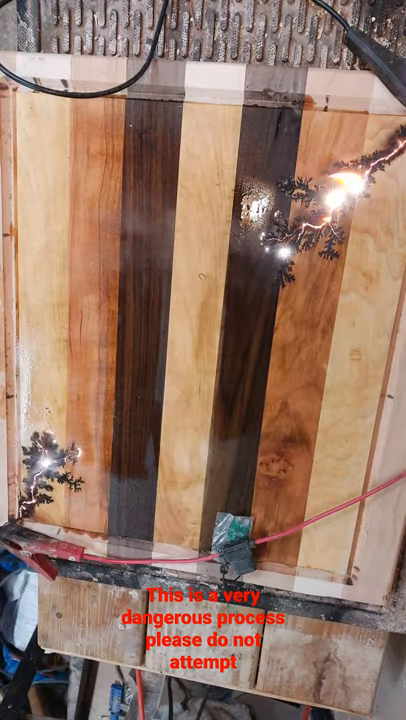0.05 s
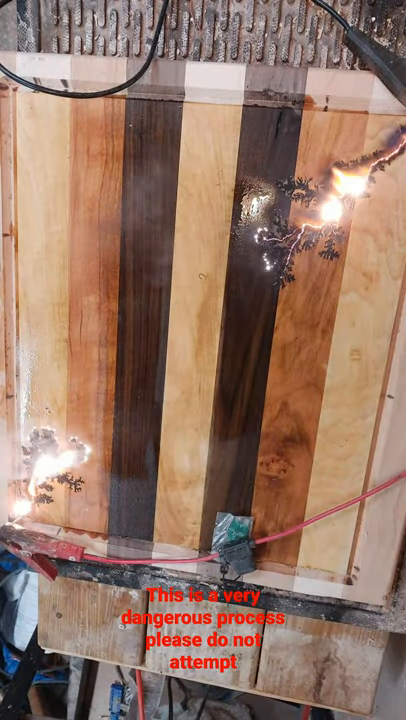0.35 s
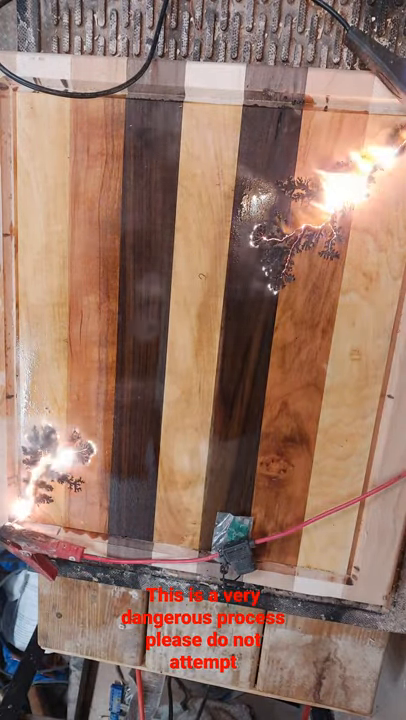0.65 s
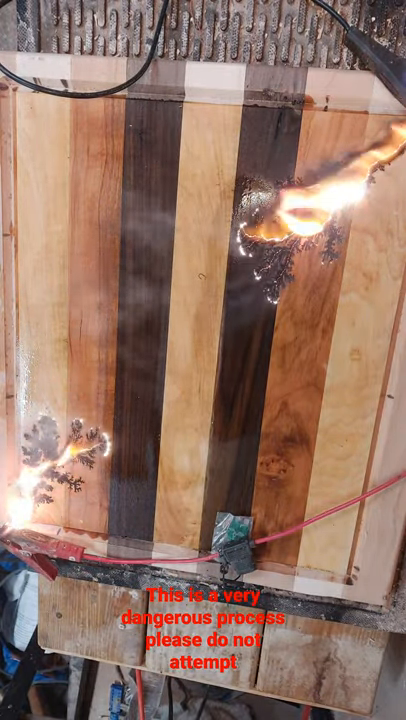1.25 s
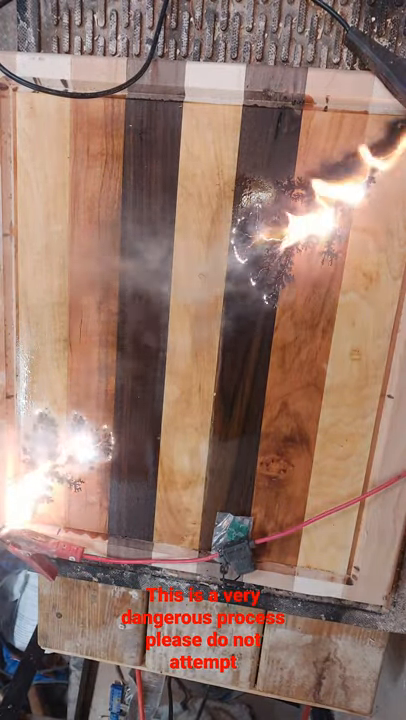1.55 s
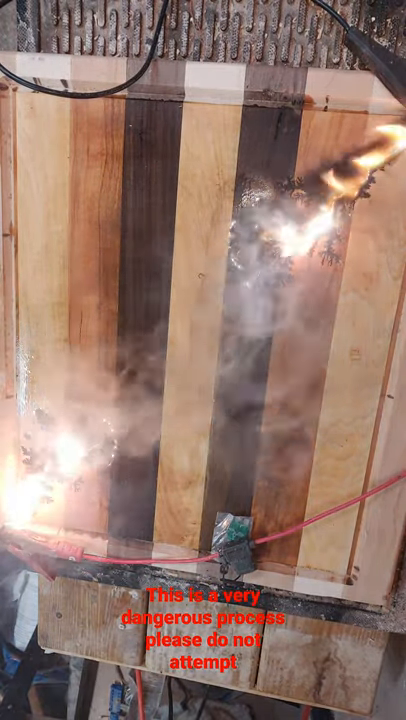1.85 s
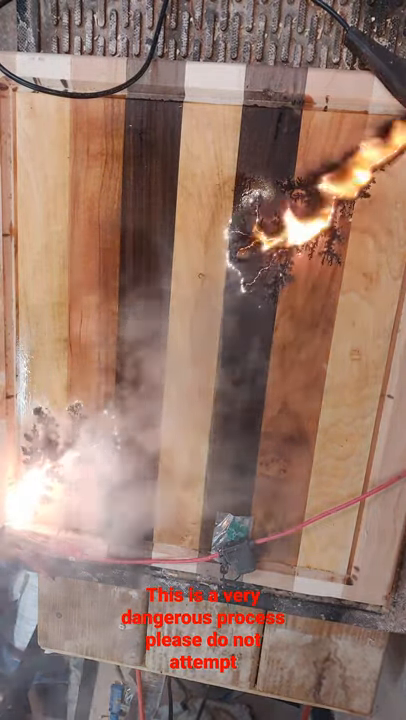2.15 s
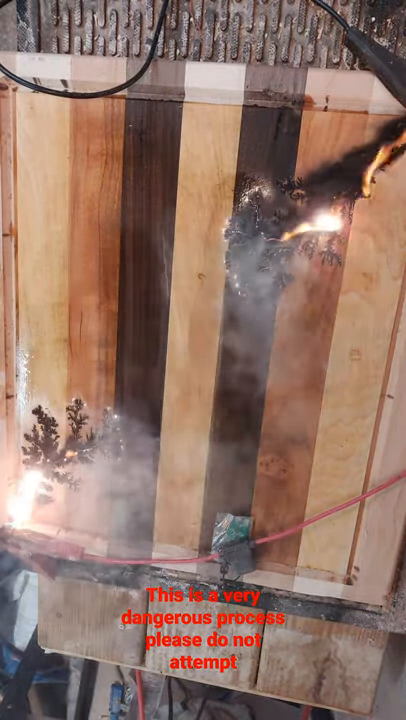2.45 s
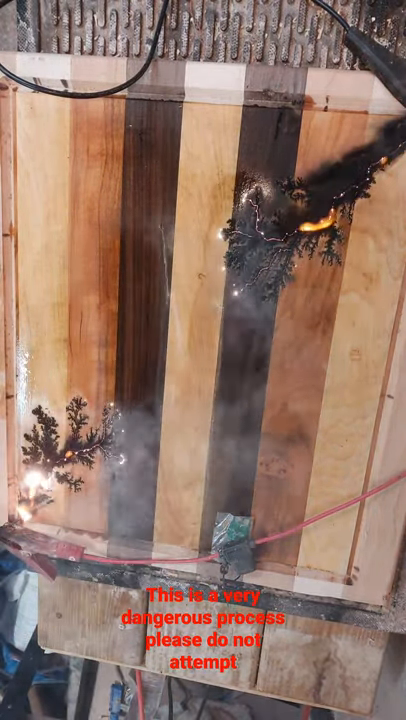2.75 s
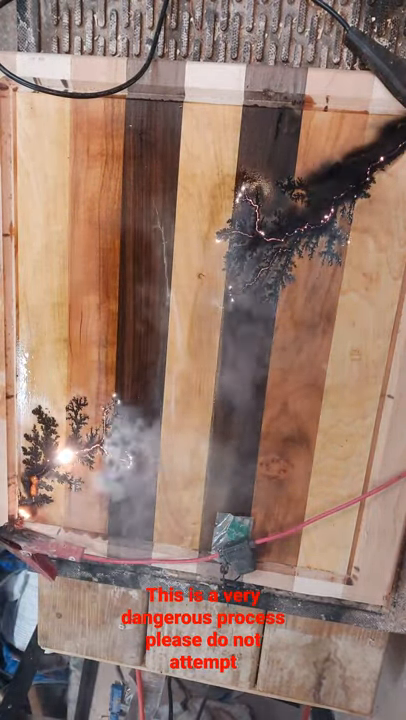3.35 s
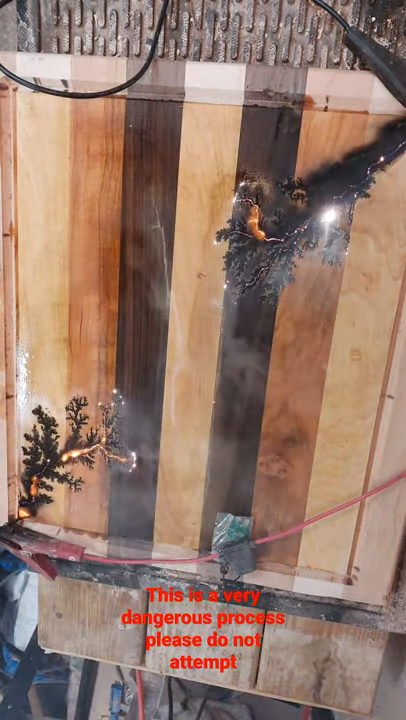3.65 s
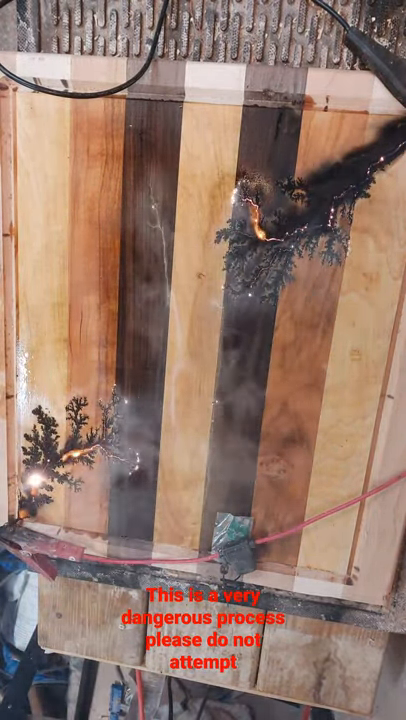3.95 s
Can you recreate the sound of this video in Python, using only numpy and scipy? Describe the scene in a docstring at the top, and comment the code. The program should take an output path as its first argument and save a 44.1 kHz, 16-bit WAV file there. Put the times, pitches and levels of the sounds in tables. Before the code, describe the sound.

High-voltage current buzzes through a wooden board over a deep hum and hissing sizzle. Tiny crackles, faint steam squeaks and soft flame puffs come and go. The buzz fades past halfway and partly returns, over faint workshop rumble.

```python
"""Mains-frequency high voltage burns branching tracks into a damp wooden board.
The supply hums, and a flaming arc buzzes until it dies down after about 2.3 s. The tips of the
tracks sizzle with boiling sap and tiny sparks, swelling in every half cycle of the mains.
Now and then steam squeaks, wood gas puffs into flame and the damp wood spits; once it pops.
A soft workshop rumble lies underneath."""
import sys
import numpy as np
from scipy import signal
from scipy.fft import rfft, irfft
from scipy.io import wavfile

SR = 44100
rng = np.random.default_rng(int(sys.argv[2]) if len(sys.argv) > 2 else 0)


def store_pcm(level_fs):
    """Save levels as 16-bit WAV."""
    pcm = np.round(np.clip(level_fs, -1, 1) * 32767).astype(np.int16)
    wavfile.write(sys.argv[1], SR, np.atleast_2d(pcm).T)


N = 176400
TIME = np.arange(N) / SR
PULSE_HZ = 120.09   # two current peaks per mains cycle
SIZZLE_PHASE, ARC_PHASE = 0.93, 0.4066   # where in a half cycle each one peaks, from 0 to 1


def from_db(db):
    """Turn decibels into a gain."""
    return 10 ** (np.asarray(db) / 20)


def rms_one(x):
    """Scale a signal to an average power of 1."""
    return x / np.sqrt(np.mean(x ** 2) + 1e-20)


def in_time(rows):
    """Join a table's rows with straight lines: one curve for each column after the time."""
    times, *columns = np.transpose(rows)
    return [np.interp(TIME, times, column) for column in columns]


def at_hz(rows, hz):
    """Read a table's value at any frequency, sliding between rows by musical pitch."""
    row_hz, values = np.transpose(rows)
    return np.interp(np.log(hz + 1), np.log(row_hz), values)


def drift(rate_hz):
    """A random wander of typical size 1, mostly slower than the given rate."""
    hz = np.fft.rfftfreq(N, 1 / SR)
    return rms_one(irfft(rfft(rng.standard_normal(N)) / (1 + (hz / rate_hz) ** 2), N))


def pan(db):
    """Left and right gains; positive dB leans to the left."""
    gains = from_db(np.array([[.5], [-.5]]) * db)
    return gains / gains.mean(0)


def pulsing(depth, phase):
    """A rise and fall in every half cycle of the mains."""
    return rms_one(np.exp(depth * np.cos(2 * np.pi * (PULSE_HZ * TIME - phase))))


def swell(start, rise_s):
    """A quick rise to 1, then a smooth fall."""
    age = np.maximum(TIME - start, 0) / rise_s
    return age * np.exp(1 - np.minimum(age, 50))


# The treble of every noise leans right. Each row: frequency in Hz, left minus right in dB.
NOISE_PLACE = [(2000, -0.5), (5000, -8.5), (13000, -5)]

def noise(tone, envelope, alike):
    """Stereo noise with a given tone and loudness curve; alike=1 feeds both ears the same noise."""
    hz = np.fft.rfftfreq(N, 1 / SR)
    mid, side = rng.standard_normal((2, N))
    white = mid + np.sqrt((1 - alike) / (1 + alike)) * side * np.array([[1], [-1]])
    low_cut = hz ** 2 / np.hypot(hz ** 2, tone[0][0] ** 2)
    high_cut = 1 / np.hypot(1, (hz / (2 * tone[-1][0])) ** 2)
    colour = rms_one(from_db(at_hz(tone, hz)) * low_cut * high_cut)
    return irfft(rfft(white * envelope) * colour * pan(at_hz(NOISE_PLACE, hz)), N)


# The current through the board. Each row: time in seconds, hum level in dB,
# level of the octave above in dB, strength of the arc in dB.
CURRENT = [(0, -55, -62, -1.5), (.27, -47, -62, 0.5), (1.1, -44.5, -63.5, 1), (1.7, -43.5, -61.5, 1),
           (2.25, -44, -61, 0.5), (2.35, -49, -67.5, -12.5), (2.72, -50.5, -72.5, -16.5),
           (3.06, -53.5, -77, -23.5), (3.35, -49.5, -63.5, -11.5), (4, -49.5, -58, -7)]

def hum():
    """The current makes a deep hum and the two octaves above it, the same in both ears."""
    low_db, octave_db, _ = in_time(CURRENT)
    turn = 2 * np.pi * (PULSE_HZ * TIME - ARC_PHASE)
    tones = from_db(low_db) * (np.cos(turn) + from_db(-29) * np.sin(4 * turn))
    tones -= from_db(octave_db) * np.cos(2 * turn)
    return np.sqrt(2) * from_db(.4 * drift(19)) * tones


# The arc's buzz. Each row: multiple of the pulse rate, base level in dB,
# left minus right in dB, extra dB while the arc is young.
ARC_BUZZ = [(3, -63, -9, -2), (5, -71, 17.5, -0.5), (6, -81, 3.5, 6.5), (7, -80, -16, 8), (9, -76, 16, -4),
            (14, -81, -31, 5)]
# The arc's rough rush. Each row: frequency in Hz, relative level in dB.
RUSH_TONE = [(90, 5), (165, 5), (300, -13), (680, -18), (1600, -16), (1930, -7.5), (2300, -25.5)]
# The arc's thin whine. Each row: time in seconds, level in dB.
ARC_WHINE = [(0, -73), (1.6, -70.5), (2.1, -68), (2.24, -69.5), (2.33, -89)]

def arc():
    """The flaming arc strikes in every half cycle, making a buzz, a pulsing rush and a whine."""
    _, _, arc_db = in_time(CURRENT)
    jitter_s, settle_s, waver_db = .00005, 0.55, 0.15
    turn = 2 * np.pi * (PULSE_HZ * (TIME + jitter_s * drift(10)) - ARC_PHASE)
    young = np.exp(-TIME / settle_s)
    buzz = 0
    for multiple, db, pan_db, young_db in ARC_BUZZ:
        level = from_db(db + young * young_db - waver_db * drift(23))
        buzz += pan(pan_db) * level * np.cos(multiple * turn + rng.standard_normal())
    rush_level = from_db(-66 + 0.8 * arc_db) * pulsing(depth=0.69, phase=ARC_PHASE)
    rush = noise(RUSH_TONE, rush_level, alike=0.94)
    whine = from_db(in_time(ARC_WHINE)[0] - waver_db * drift(10)) * np.cos(16 * turn)
    return rush - np.sqrt(2) * (from_db(arc_db) * buzz + whine)


def sparks(per_second=130, decay_s=0.00072, spread_db=5, cluster_db=3.5):
    """The power of tiny random sparks that flare and die, plus a flutter; it averages 1."""
    sizes = from_db(spread_db * np.minimum(rng.exponential(1, N), 2))
    born = rng.random(N) < per_second / SR
    decay = np.exp(-1 / (decay_s * SR))
    flares = signal.lfilter([1], [1, -2 * decay, decay ** 2], (sizes * born) ** 2 + 1e-18)
    clusters = from_db(cluster_db * np.minimum(drift(64), 2)) ** 2
    power = flares / flares.mean() + clusters
    return power / power.mean()


# How loud the sizzle is. Each row: time in seconds, its body in dB, its high hiss in dB.
SIZZLE_LEVELS = [(0, -71, -66), (.5, -66.5, -59.5), (1.75, -65, -57.5), (2.36, -70, -63.5),
                 (2.7, -67.5, -58.5), (3.03, -69.5, -61.5), (3.2, -67, -59.5), (4, -67, -59)]
# The tone of the body and of the hiss. Each row: frequency in Hz, relative level in dB.
BODY_TONE = [(300, 9.5), (700, -7), (1200, -1.5), (1900, 2), (2400, -3), (2900, 2), (3900, -3.5),
             (4500, 0.5), (5000, -4.5), (5500, 0), (6800, -5), (8000, -15.5), (10000, -12)]
HISS_TONE = [(7000, -68), (10000, -17), (11200, -7), (12300, 1), (14200, -1.5), (15600, 4.5)]

def sizzle(spark_share=0.59):
    """Boiling sap and tiny sparks sizzle, loudest at one moment of each half cycle."""
    body_db, hiss_db = in_time(SIZZLE_LEVELS)
    grain = np.sqrt(1 - spark_share + spark_share * sparks())
    body = noise(BODY_TONE, from_db(body_db) * grain * pulsing(0.33, SIZZLE_PHASE), alike=0)
    hiss = noise(HISS_TONE, from_db(hiss_db) * grain * pulsing(0.3, SIZZLE_PHASE), alike=0)
    return body + hiss


def bench_echoes(sound, count=4, echo_db=-15, longest_s=.007):
    """The bench and nearby walls throw back a few quick echoes, different in each ear."""
    gain, out = from_db(echo_db), sound.copy()
    delays = (rng.uniform(0.31, 1, (2, count)) * longest_s * SR).astype(int)
    for ear in range(2):
        for delay in delays[ear]:
            out[ear, delay:] += gain * sound[ear, :N - delay]
    return out / np.sqrt(1 + count * gain ** 2)


# The workshop's background. Each row: frequency in Hz, relative level in dB.
WORKSHOP_TONE = [(28, -23), (42, 1.5), (95, 0), (330, -11), (2500, -38)]

def workshop():
    """The room rumbles softly and steadily."""
    return noise(WORKSHOP_TONE, from_db(-69.5), alike=0.85)


def ring(hz=4483, width_hz=350, end_s=1.6):
    """A thin, breathy ring in the sizzle swells as the arc catches and fades as the flame grows."""
    fade = np.sin(np.pi * np.clip(TIME / end_s, 0, 1))
    tone = [(hz / 2, -60), (hz - width_hz, -30), (hz, 0), (hz + width_hz, -30), (2 * hz, -60)]
    return noise(tone, from_db(-79) * fade, alike=0)


# The clear squeaks of steam. Each row: start in seconds, level in dB, pitch in Hz.
STEAM_SQUEAKS = [(.063, -65, 2480), (1.298, -62, 2920), (1.343, -60.5, 2910), (2.225, -55, 2770),
                 (3.105, -62.5, 2960), (3.243, -57.5, 2840), (3.6, -58, 2870)]

def squeaks(length_s=0.022, faint_hz=2900):
    """Steam whistles through the pores of the wood: a few clear squeaks and many faint ones."""
    waver_hz = 34.1 * drift(152)
    body_db, _ = in_time(SIZZLE_LEVELS)
    faint_level = from_db(body_db - 16.5 + 8.5 * np.minimum(drift(57), 2))
    out = faint_level * np.sin(2 * np.pi * np.cumsum(faint_hz + 2 * waver_hz) / SR)
    for start, db, hz in STEAM_SQUEAKS:
        envelope = np.sin(np.pi * np.clip((TIME - start) / length_s, 0, 1))
        out += from_db(db) * envelope * np.sin(2 * np.pi * np.cumsum(hz + waver_hz) / SR)
    return out


# The puffs of flame. Each row: start in seconds, level in dB.
FLAME_PUFFS = [(.298, -54.5), (0.903, -60), (1.311, -61), (1.637, -54.5), (3.422, -55.5)]
# The tone of a puff. Each row: frequency in Hz, relative level in dB.
PUFF_TONE = [(90, 2.5), (160, -2), (330, -6), (1200, -23.5)]

def puffs():
    """Wood gas catches fire with a soft, low puff."""
    envelope = sum(from_db(db) * swell(start, rise_s=0.0083) for start, db in FLAME_PUFFS)
    return noise(PUFF_TONE, envelope, alike=0.94)


# The spits. Each row: start in seconds, base level in dB, dullness in dB (more lows, less hiss).
WOOD_SPITS = [(0.2983, -63, 17.5), (0.911, -58, 9), (1.180, -53.5, 1), (1.232, -51, 1), (1.281, -57, -3),
              (1.7453, -49.5, 2.5), (1.8623, -53.5, -2), (1.9286, -49.5, 1), (1.954, -50, 1),
              (1.9622, -48, 1), (1.979, -49, 7), (2.2035, -51, -2), (2.2203, -50, 3), (2.228, -45.5, 1),
              (2.2358, -51, 4), (2.7618, -55, 0), (2.768, -52.5, -3), (3.177, -56.5, 5), (3.1856, -61.5, 8),
              (3.2038, -54.5, -2), (3.253, -55.5, 2.5), (3.4602, -57, 8), (3.544, -55.5, -3.5),
              (3.594, -53, 10.5), (3.611, -62, -9), (3.6617, -59, -6), (3.6873, -57.5, -3)]
# The low part of a spit. Each row: frequency in Hz, relative level in dB.
SPIT_LOW_TONE = [(400, -25), (900, 1), (1900, 6), (2700, -17)]

def spits():
    """Damp wood bursts in tiny spits, each with its own tone and a short tail in the room."""
    power = np.zeros((3, N))
    for start, db, dull_db in WOOD_SPITS:
        burst = swell(start, rise_s=0.0015)
        tail = from_db(-13.5) * swell(start, rise_s=0.008)
        gains = from_db([[db + dull_db - 11.5], [db - 2.5], [db - dull_db + 4.5]])
        power += gains ** 2 * (burst ** 2 + tail ** 2)
    low, body, hiss = np.sqrt(power)
    return (noise(SPIT_LOW_TONE, low, alike=0.59)
            + noise(BODY_TONE, body, alike=0) + noise(HISS_TONE, hiss, alike=0))


# The notes of the popping wood. Each row: pitch in Hz, level in dB.
POP_NOTES = [(950, -48), (1400, -54), (2020, -49)]

def pop(start=1.8138):
    """A pocket of steam bursts and the wood around it rings briefly."""
    notes = sum(from_db(db) * np.sin(2 * np.pi * hz * (TIME - start)) for hz, db in POP_NOTES)
    return swell(start, rise_s=0.0014) * notes


def scene():
    """All the sounds of the board over the workshop's background."""
    electric = hum() + arc()
    crackle = bench_echoes(sizzle() + spits() + pop())
    return electric + crackle + squeaks() + ring() + puffs() + workshop()


def record(dry):
    """Cut away the very highest treble."""
    cutoff_hz = 15900
    return signal.sosfilt(signal.ellip(12, .1, 80, cutoff_hz, fs=SR, output="sos"), dry)


dry = scene()
out = record(dry)
store_pcm(out)
```